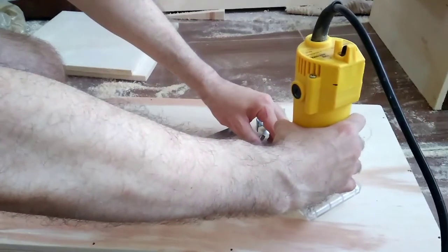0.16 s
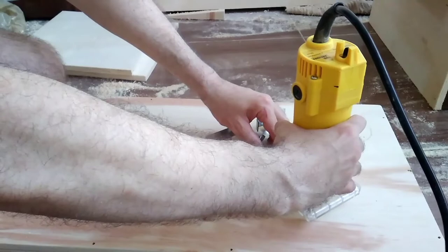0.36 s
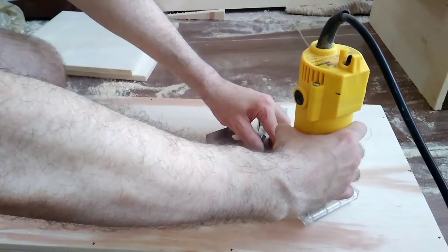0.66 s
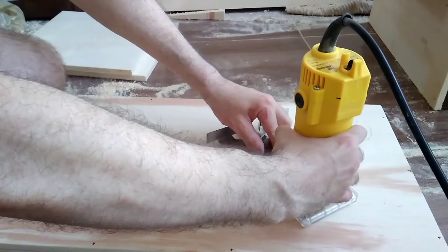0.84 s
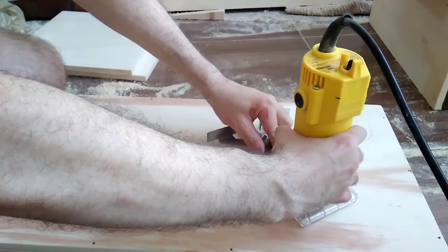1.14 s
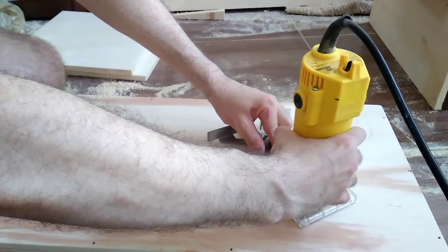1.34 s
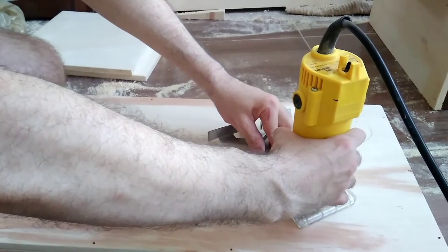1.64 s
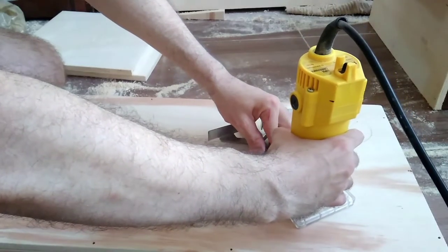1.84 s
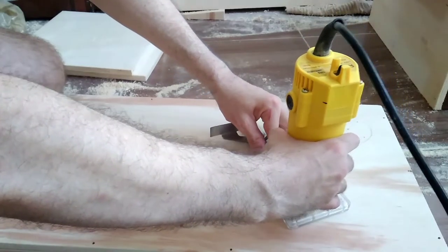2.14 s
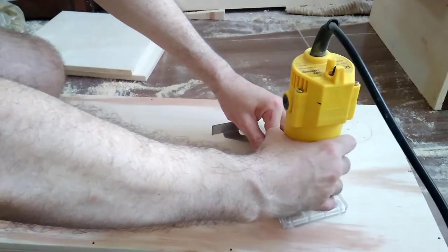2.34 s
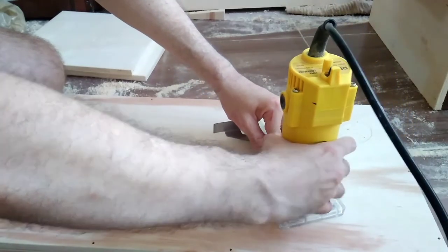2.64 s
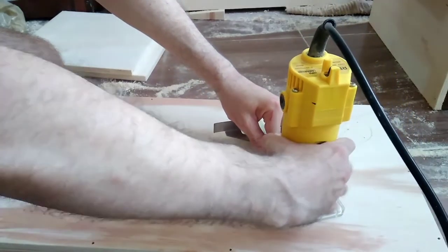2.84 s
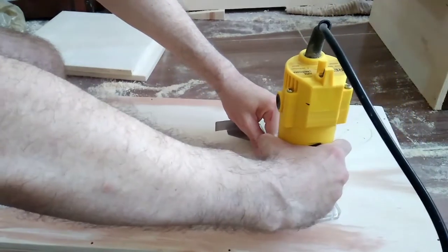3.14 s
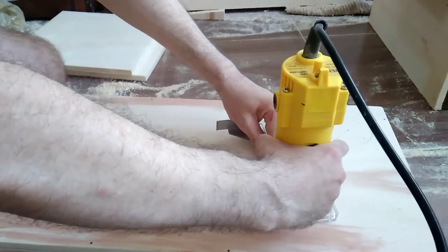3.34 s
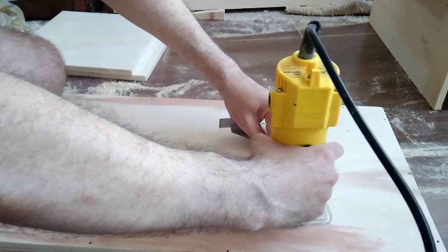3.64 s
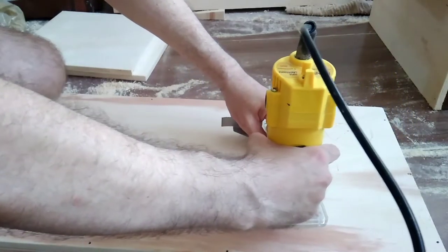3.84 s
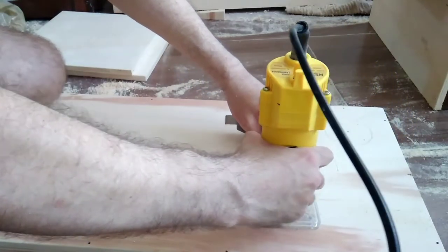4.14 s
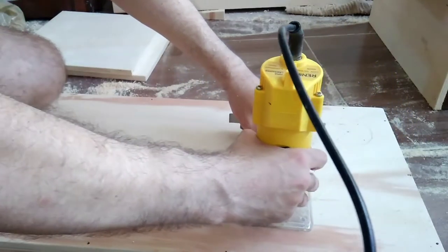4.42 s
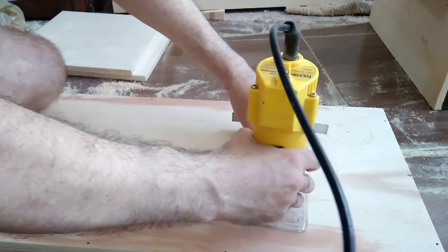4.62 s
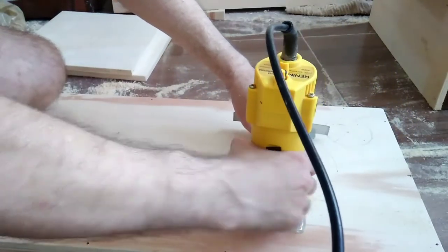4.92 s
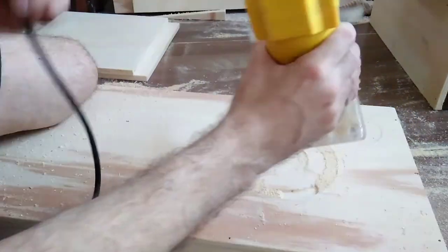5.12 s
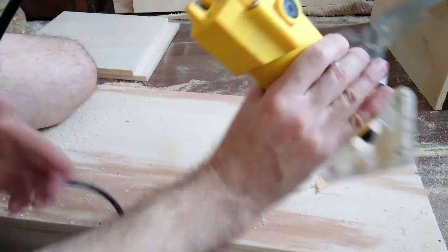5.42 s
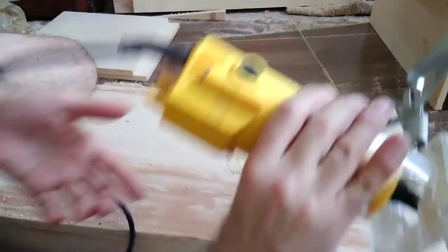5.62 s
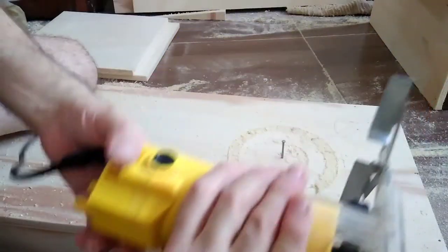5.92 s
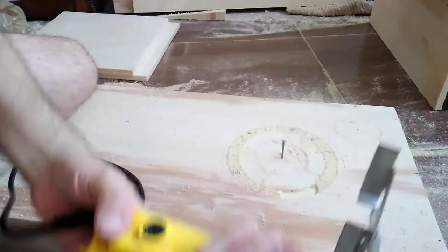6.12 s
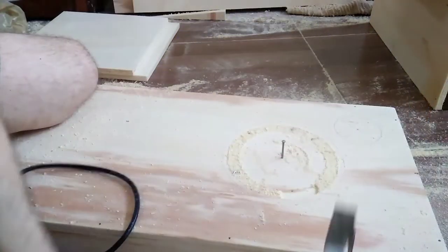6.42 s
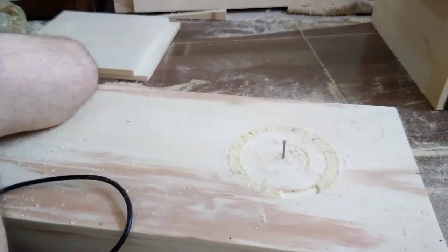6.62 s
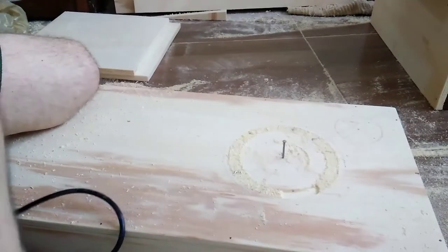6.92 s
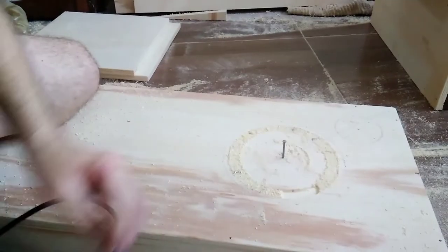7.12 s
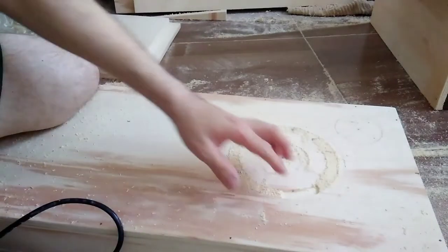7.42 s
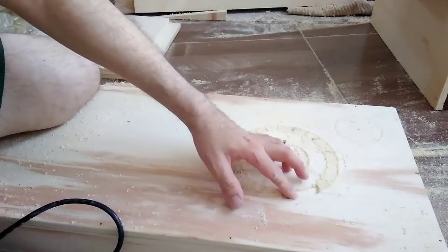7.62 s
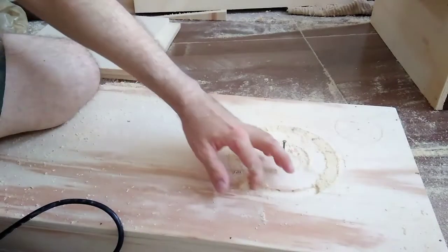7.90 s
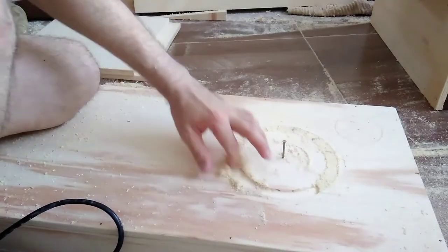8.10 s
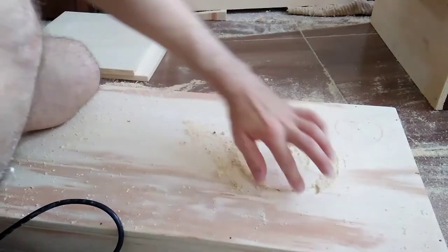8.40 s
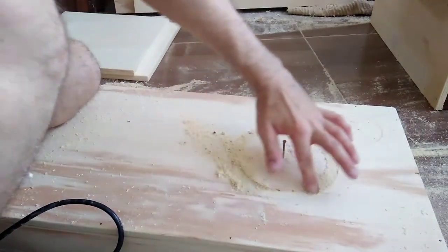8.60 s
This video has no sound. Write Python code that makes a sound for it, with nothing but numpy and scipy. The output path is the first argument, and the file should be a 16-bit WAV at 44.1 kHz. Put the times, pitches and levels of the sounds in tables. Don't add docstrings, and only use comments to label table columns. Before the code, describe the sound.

A trim router cuts plywood with a loud, harsh, buzzing whine and gritty chip noise, its pitch rising briefly then sagging under load. After about five seconds it jumps abruptly to a much quieter, airy whirr falling as the motor coasts. Light taps, a sharp metallic clatter with a thin squeak, then a few wooden knocks as it is laid down, and near silence. Close small microphone, bright and rough, in a room.

```python
import sys
import numpy as np
from scipy import signal
from scipy.fft import rfft, irfft, next_fast_len
from scipy.io import wavfile
from scipy.ndimage import uniform_filter1d

SR = 44100
rng = np.random.default_rng(int(sys.argv[2]) if len(sys.argv) > 2 else 0)


def transcribe(signal):
    frames = np.atleast_2d(signal).T
    limited = np.clip(frames, -1, 1)
    pcm = np.round(limited * 32767).astype(np.int16)
    wavfile.write(sys.argv[1], SR, pcm)


def rack_gain(trim_db):
    fader = np.asarray(trim_db, float)
    return 10 ** (fader / 20)


N = 385875
TIME = np.arange(N) / SR
FFT_SIZE = next_fast_len(N)
BINS_HZ = np.maximum(np.fft.rfftfreq(FFT_SIZE, 1 / SR), 1)

JUMP_S = 4.978
BARS, SLOTS = 24, 8
DRIFT_STEP = 64
TOP_HZ = 14280

# frequency in Hz, level in dB rms.
HOUSE_TONES = [(395, -71), (980, -87)]
# time in seconds, rumble level in dB,
# boards level in dB, housing level in dB, hiss level in dB.
AIR_LEVELS = [(4.98, -52, -62, -53.5, -47), (5.18, -54, -66, -50, -42.5), (5.42, -54, -52, -47, -43.5),
              (5.66, -55, -59, -47, -39), (5.82, -53, -64, -46.5, -45.5), (6.03, -51.5, -65, -51, -45),
              (6.26, -47, -63, -51, -42), (6.4, -51, -54.5, -54.5, -44), (6.59, -58, -60, -54, -47.5),
              (6.69, -56, -60, -57, -50.5), (7.0, -46, -62, -59.5, -56), (7.22, -57, -68, -58, -54),
              (7.35, -56, -73, -63.5, -50), (7.49, -57, -67, -62, -59), (7.55, -54, -53, -61, -63.5),
              (7.68, -52, -53, -57.5, -68.5), (7.77, -59, -55, -64, -67), (7.86, -61.5, -61, -68, -75.5),
              (8.16, -72, -63.5, -74, -67.5), (8.36, -75, -70, -76, -83.5), (8.61, -74, -72, -77, -87.5),
              (8.75, -73.5, -71.5, -71.5, -67)]
# frequency in Hz, density in dB per Hz.
WHIR_SPECTRUM = [(15, -56), (25, -28), (46, -8), (76, 3.5), (114, -10), (193, -14.5), (229, -20),
                 (370, -12.5), (421, -17), (512, -6.5), (597, -10.5), (882, -8), (1070, -18), (2610, -13.5),
                 (4500, -17.5), (5850, -46.5), (9900, -120)]
# frequency in Hz, density in dB per Hz.
HISS_SPECTRUM = [(2650, -41), (4500, -13.5), (5300, -9), (6440, -9), (8200, 2), (10100, -13),
                 (11100, -17.5), (13700, -24), (14300, -25)]
# frequency in Hz, width in Hz, level in dB.
SHELL_MODES = [(382, 30, -1.5), (515, 30, 4), (708, 40, 1), (858, 69, 0.5), (2070, 130, -1),
               (2600, 120, 2.5)]
# frequency in Hz, level in dB, t60 in seconds.
FLOOR_MODES = [(147, 1, 0.16), (299, 0.5, .1), (480, 0, 0.087), (870, -4, .06), (1160, 0, 0.044)]
# frequency in Hz, density in dB per Hz.
CRACK_SPECTRUM = [(240, -47), (400, -11.5), (2200, -9), (2680, -18), (2970, -13), (5490, -19), (8100, 1.5),
                  (14300, -31)]
# start in seconds, peak in dB, thump in dB, ring in dB,
# rise in seconds, fall in seconds.
BAR_HITS = [
    (6.5196, -33.5, -52, 0.5, 0.0045, 0.0088),
    (6.6817, -40.5, -57, 0, 0.004, 0.009),
    (7.234, -29.5, -50.5, 2.5, 0.004, 0.008),
    (7.2462, -19.5, -47, -0.5, 0.0044, 0.0095),
    (7.26, -20, -52.5, -2, 0.0037, 0.0074),
    (7.2734, -25, -50, -0.5, 0.004, 0.0076),
]
# frequency in Hz, level in dB.
BAR_MODES = [(980, -12), (1800, -6.5), (2250, -9), (3000, -8), (3450, -6), (4700, -6), (6650, 5),
             (8100, 5.5), (9000, 2), (9800, -10), (12100, -11.5)]
# start in seconds, peak in dB, thump in dB, ring in dB,
# rise in seconds, fall in seconds.
BASE_HITS = [
    (7.496, -44.5, -42, -2, 0.0026, 0.012),
    (7.5174, -44.5, -42, -1.5, 0.0026, 0.012),
    (7.662, -28.5, -35, -4.5, 0.0022, 0.014),
    (7.6946, -20, -44, -2, 0.003, 0.014),
    (7.748, -38, -43, -1.5, 0.0022, 0.01),
    (7.7974, -46, -53, -3, 0.003, 0.012),
    (7.9654, -57, -57, -3.5, 0.0023, 0.015),
]
# frequency in Hz, level in dB.
BASE_MODES = [(1800, -8), (2900, -8), (3700, -10), (4780, -7.5), (4950, -6), (6800, -9), (7200, -6.5),
              (8300, -4), (12600, -11.5)]
# time in seconds, bar-passing frequency in Hz, then levels in dB of the shaft,
# slot, bar, second bar and third bar lines.
COAST_LINES = [(4.98, 5160, -69, -53, -49, -63, -90), (5.3, 4636, -54, -55.5, -64, -53, -90),
               (5.75, 3883, -71, -62, -50.5, -47, -80), (6.0, 3584, -73, -65, -59, -60, -74),
               (6.3, 3000, -79, -83, -49, -64, -61), (6.48, 2760, -84, -80, -66, -74, -41),
               (6.62, 2490, -71, -82, -58, -78, -53), (6.87, 2125, -85, -82, -85, -72, -57),
               (7.08, 1810, -85, -87, -63, -83, -60), (7.15, 1700, -95, -95, -90, -95, -90)]
# time in seconds, frequency in Hz, level in dB.
BEARING_SQUEAK = [
    (7.18, 6450, -85),
    (7.2, 6400, -64),
    (7.24, 6150, -64),
    (7.27, 6650, -58),
    (7.35, 6750, -56),
    (7.43, 6050, -65),
    (7.5, 5600, -63),
    (7.53, 5500, -90),
]
# time in seconds, shaft frequency in Hz, low level in dB, treble level in dB,
# low tone share in dB, treble tone share in dB, lift of even orders in dB.
CUT_COURSE = [(0.0, 423.3, -28.5, -23, 4.5, -1.5, -1.5), (0.03, 425, -24, -23.5, -6.5, -12, 2),
              (0.35, 447.7, -25, -24, -2.5, -5, 1), (0.75, 464.4, -24.5, -25.5, -5, -1, 7),
              (0.9, 467, -24.5, -23.5, 3, 0.5, -4.5), (1.12, 468.2, -28, -25, 0, -3, 3.5),
              (1.25, 466.3, -25, -25, 6, 6, -9), (1.37, 458.8, -27.5, -27.5, -7.5, 5, 6.5),
              (1.48, 450.4, -28.5, -26, -1.5, 4, 3), (1.58, 430.7, -27.5, -22.5, -1.5, -1.5, 4),
              (1.84, 417, -26.5, -23.5, -1.5, -4, -1.5), (2.02, 396.5, -27, -24, 6, 1.5, -6.5),
              (2.16, 374, -21, -23.5, -8, -2.5, 8.5), (2.24, 354.8, -26.5, -26.5, -3, 3.5, 12),
              (2.4, 337.8, -24.5, -29.5, -0.5, 11, 9), (2.6, 318.6, -26.5, -25, -1, 1, 9),
              (2.77, 314.6, -29, -25.5, 6.5, 4.5, 5.5), (2.92, 316.8, -28.5, -25, -0.5, -1, 8),
              (3.05, 323.6, -28, -21.5, 4.5, 0.5, -1), (3.1, 320, -29, -21.5, -2.5, -9.5, 9.5),
              (3.27, 302.3, -24.5, -24.5, -5, -1.5, 6), (3.33, 296.4, -26.5, -24.5, 3, -0.5, 0.5),
              (3.45, 293, -29, -27, 2, 5.5, 1), (3.59, 280.9, -28.5, -22.5, 6, -0.5, -11),
              (3.82, 267, -25, -25, -1, 0.5, 3), (3.95, 266.1, -29.5, -22.5, 3.5, -6.5, 2.5),
              (4.12, 258.7, -28.5, -26.5, 7, 3, 2), (4.32, 260.8, -30, -26.5, 3.5, 2.5, 4),
              (4.46, 262.9, -31.5, -26.5, 5.5, 3, -1), (4.78, 262.6, -32, -27, 4, 0, 2.5),
              (4.86, 262.5, -26.5, -27, 0.5, -2, -0.5), (4.93, 279, -28, -25.5, -1.5, -3, -9),
              (4.98, 280, -25.5, -33, 0.5, 8, -5.5)]
# time in seconds, shaft frequency in Hz, orders 1, 2 and 4 in dB.
SHAFT_HUM = [(0.0, 420.4, -31.5, -34.5, -39.5), (0.14, 435.0, -30.5, -46, -39.5),
             (0.22, 434.6, -32, -36.5, -52), (0.33, 448.5, -29.5, -54, -47), (0.36, 447.8, -32, -42, -42.5),
             (0.65, 461.2, -33.5, -36.5, -55), (0.79, 463.5, -40.5, -46, -38.5),
             (0.89, 467.3, -30, -52, -50), (0.91, 468.9, -32, -35, -45.5),
             (1.32, 464.5, -34.5, -34.5, -40.5), (1.41, 456.3, -34.5, -39.5, -54.5),
             (1.51, 439.7, -37, -29.5, -36), (1.83, 417.4, -32.5, -44.5, -52),
             (1.94, 407.9, -33.5, -34.5, -40), (2.15, 377.9, -40, -43, -43), (2.41, 335.8, -37.5, -41, -45),
             (2.59, 322.3, -43, -30, -37), (2.79, 313.0, -42.5, -41.5, -51.5),
             (3.01, 323.9, -36, -38, -36.5), (3.15, 317.4, -49, -25.5, -51), (3.17, 310.8, -41, -31.5, -33),
             (3.69, 276.1, -40, -37.5, -38.5), (4.06, 259.7, -46, -32, -32),
             (4.27, 260.2, -38.5, -50.5, -31.5), (4.42, 262.7, -47, -28.5, -34.5),
             (4.88, 263.5, -51.5, -29.5, -31), (4.92, 271.9, -38, -31.5, -50.5),
             (4.98, 282.2, -39, -28, -49.5)]
# frequency in Hz, level in dB.
STRIKE_SPECTRUM = [(500, -10.5), (1100, -1.5), (1600, -2), (2200, -5.5), (3100, -5.5), (3700, -4),
                   (4800, -11), (6300, -5), (7300, -7), (8100, 5), (8900, -6), (10200, -11.5), (12500, -18),
                   (14300, -22.5)]
# frequency in Hz, density in dB per Hz.
CHIP_SPECTRUM = [(15, -32), (25, -4.5), (206, -7.5), (370, -4.5), (559, -2.5), (695, -3), (1300, -1.5),
                 (1730, -3), (3040, -0.5), (4500, -3), (5850, -31.5), (9900, -120)]
# frequency in Hz, density in dB per Hz.
SPRAY_SPECTRUM = [(2650, -41.5), (4500, -12.5), (6500, -8), (8040, 2), (9340, -10.5), (13700, -22),
                  (14300, -22)]
# time in seconds, share from 0 to
NOISE_SHARE = [(0, .7), (1, .6), (1.3, .3), (4.7, .22), (4.9, .6), (6.5, .6), (7.2, .5), (8.75, .4)]


def rms_one(x):
    return x / np.sqrt(np.mean(x ** 2) + 1e-20)


def in_time(rows):
    s, *columns = np.transpose(rows)
    return [np.interp(TIME, s, c) for c in columns]


def at_hz(points, hz):
    points = np.array(points)
    return np.interp(np.log(hz), np.log(points[:, 0]), points[:, 1])


def drift(rate):
    r = np.exp(-2 * np.pi * DRIFT_STEP * rate / SR)
    white = rng.standard_normal(N // DRIFT_STEP + 1002)
    slow = signal.lfilter([1], [1, -2 * r, r * r], white)[1000:]
    return np.interp(np.arange(N) / DRIFT_STEP, np.arange(len(slow)), rms_one(slow))


def keep_bins(spectrum, low_hz, high_hz):
    inside = (BINS_HZ >= low_hz) * (BINS_HZ < high_hz)
    return irfft(spectrum * inside, FFT_SIZE)[:N]


def band(x, low_hz, high_hz):
    return keep_bins(rfft(x, FFT_SIZE), low_hz, high_hz)


def sine(db, phase):
    return np.sqrt(2) * rack_gain(db) * np.sin(phase)


def ring(clicks, hz, t60):
    r, w = rack_gain(-60 / (t60 * SR)), 2 * np.pi * hz / SR
    return signal.lfilter([0, np.sin(w)], [1, -2 * r * np.cos(w), r * r], clicks + 1e-18)


def noise_parts(spectrum, splits, patchy_db, rate):
    low_hz, high_hz = spectrum[0][0], spectrum[-1][0]
    half_octaves = np.clip(30 * 2 ** np.arange(0, 9, .5), low_hz, high_hz)
    edges = np.unique([low_hz, high_hz, *splits, *half_octaves])
    coloured = rfft(rng.standard_normal(FFT_SIZE)) * rack_gain(at_hz(spectrum, BINS_HZ))
    parts = np.zeros((len(splits) + 1, N))
    together = drift(6.9)
    for low, high in zip(edges, edges[1:]):
        flicker = rack_gain(patchy_db * (.4 * together + drift(rate)))
        part = np.searchsorted(splits, low, side="right")
        parts[part] += flicker * keep_bins(coloured, low, high)
    return [rms_one(p) for p in parts]


def room(x):
    t60_s, level_db = .45, -6
    age = np.arange(SR // 2) / SR
    tail = rng.standard_normal(len(age)) * rack_gain(-60 * age / t60_s) * (age > .006)
    return rack_gain(level_db) * signal.fftconvolve(x, tail / np.sqrt(np.sum(tail ** 2)))[:N]


def house_tones():
    return sum(sine(db + 2. * drift(4.2), 2 * np.pi * hz * TIME + drift(2.6)) for hz, db in HOUSE_TONES)


def shell():
    white = rng.standard_normal(N)
    out = np.zeros(N)
    for hz, width, db in SHELL_MODES:
        out += rack_gain(db + 3.8 * drift(2.5)) * rms_one(ring(white, hz, 2.6 / width))
    return out


def whir():
    rumble, boards, housing = noise_parts(WHIR_SPECTRUM, [130, 450], patchy_db=2.5, rate=17.0)
    hiss, = noise_parts(HISS_SPECTRUM, [], patchy_db=2.25, rate=12.)
    rumble_db, boards_db, housing_db, hiss_db = in_time(AIR_LEVELS)
    running = TIME < 7.1
    tool = rack_gain(housing_db) * (housing + rack_gain(-15) * shell() * running)
    return rack_gain(rumble_db) * rumble + rack_gain(boards_db) * boards + tool + rack_gain(hiss_db) * hiss


def knocks(events, modes, t60):
    crack, = noise_parts(CRACK_SPECTRUM, [], patchy_db=-0.5, rate=10)
    white = rng.standard_normal(N)
    rattle, rings, thumps = np.zeros((3, N))
    for s, peak_db, thump_db, ring_db, rise, fall in events:
        age = np.maximum(TIME - s, 0)
        shape = (1 - np.exp(-age / max(rise, .0005))) * np.exp(-age / max(fall, .002))
        rattle += rack_gain(peak_db - 9) * shape
        rings += rack_gain(peak_db + ring_db - 31.5) * shape
        thumps += rack_gain(thump_db - 27.5) * shape
    out = rattle * crack
    for k, (hz, db) in enumerate(modes):
        out += rack_gain(db) * ring(rings * np.roll(white, 99 * k), hz, t60)
    for k, (hz, db, floor_t60) in enumerate(FLOOR_MODES):
        out += rack_gain(db) * ring(thumps * np.roll(white, 77 * k), hz, floor_t60)
    return out


def bearing_squeak():
    hz, db = in_time(BEARING_SQUEAK)
    level_db = db + 2. * drift(13.0)
    return sine(level_db, 2 * np.pi * np.cumsum(hz) / SR + 1.2 * drift(30.))


def coasting():
    bars_hz, *levels_db = in_time(COAST_LINES)
    turn = 2 * np.pi * np.cumsum(bars_hz / BARS) / SR
    out = np.zeros(N)
    for order, db in zip((1, SLOTS, BARS, 2 * BARS, 3 * BARS), levels_db):
        out += sine(db + 4.9 * drift(8.2), order * turn + 1.0 * drift(25.))
    return out


def flute_strikes(turn, shaft_hz, even_db):
    low, treble = np.zeros(N), np.zeros(N)
    for order in [3, *range(5, 56)]:
        hz = order * shaft_hz
        level_db = at_hz(STRIKE_SPECTRUM, hz) + even_db * (order % 2 == 0) + 4.56 * drift(12.8)
        wobble = rng.uniform(0, 2 * np.pi) + (0.55 + 0.017 * order) * drift(11.0)
        line = rack_gain(level_db) * np.sin(order * turn + wobble) * (hz < 14300)
        lowness = np.clip((4700 - hz) / 400, 0, 1)
        low += line * lowness
        treble += line * (1 - lowness)
    return low, treble


def shaft_hum(turn):
    out = np.zeros(N)
    for order, db in zip((1, 2, 4), in_time(SHAFT_HUM)[1:]):
        out += sine(db + 2. * drift(22.0), order * turn + 0.73 * drift(7.2))
    return out


def even(x):
    return x / np.sqrt(uniform_filter1d(x ** 2, size=SR // 2))


def cutting():
    shaft_hz, low_db, treble_db, low_tone_db, treble_tone_db, even_db = in_time(CUT_COURSE)
    turn = 2 * np.pi * np.cumsum(shaft_hz) / SR
    low_lines, treble_lines = flute_strikes(turn, shaft_hz, even_db)
    chips, = noise_parts(CHIP_SPECTRUM, [], patchy_db=1.3, rate=15.)
    air, = noise_parts(SPRAY_SPECTRUM, [], patchy_db=1.2, rate=20.)
    spray = 1 + 0.3 * np.cos(2 * turn) + 0.19 * np.cos(turn)
    low = rack_gain(low_db - 5) * (chips * spray + rack_gain(low_tone_db) * even(low_lines))
    treble = rack_gain(treble_db - 0.5) * (air * spray + rack_gain(treble_tone_db - 0.5) * even(treble_lines))
    return low + treble + shaft_hum(turn)


def scene():
    before = np.clip((JUMP_S - TIME) / .003, 0, 1)
    after = house_tones() + whir() + coasting() + bearing_squeak()
    hits = knocks(BAR_HITS, BAR_MODES, t60=.05) + knocks(BASE_HITS, BASE_MODES, t60=.07)
    mono = before * cutting() + (1 - before) * after + hits + room(hits)
    return np.array([mono, mono])


def low_pass(x):
    return signal.sosfilt(signal.butter(12, 14770, fs=SR, output="sos"), x)


def record(dry):
    mono = band(0.42 * np.tanh(dry[0] / 0.43), 1, TOP_HZ)
    mid, side = mono.copy(), np.zeros(N)
    edges = [4100, *range(4800, 13300, 700), TOP_HZ]
    frames = np.arange(0, N + 1024, 1024)
    white = rng.standard_normal((2, N))
    share, = in_time(NOISE_SHARE)
    for low, high in zip(edges, edges[1:]):
        chance = share[np.minimum(frames, N - 1)] * min((low - 3800) / 3200, 1)
        draw = rng.random(len(frames) + 1)
        chosen = np.minimum(draw[1:], draw[:-1]) < 1 - np.sqrt(1 - chance)
        filled = np.interp(np.arange(N), frames, chosen)
        strip = band(mono, low, high)
        level = np.sqrt(np.maximum(uniform_filter1d(strip ** 2, size=1024), 0))
        mid += np.sqrt(filled) * level * rms_one(band(white[0], low, high)) - filled * strip
        side += rack_gain(-7.5) * filled * level * rms_one(band(white[1], low, high))
    return low_pass(np.array([mid + side, mid - side]))


dry = scene()
out = record(dry)
transcribe(out)
```